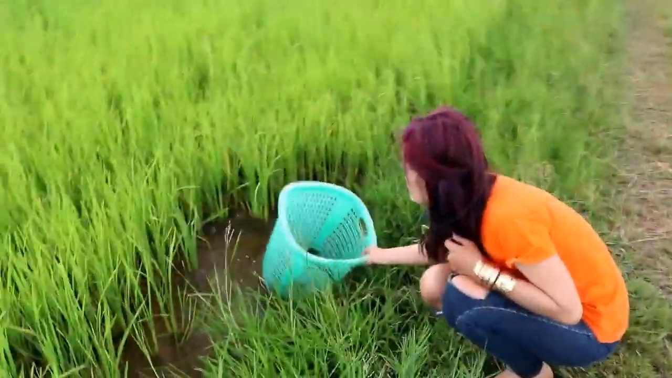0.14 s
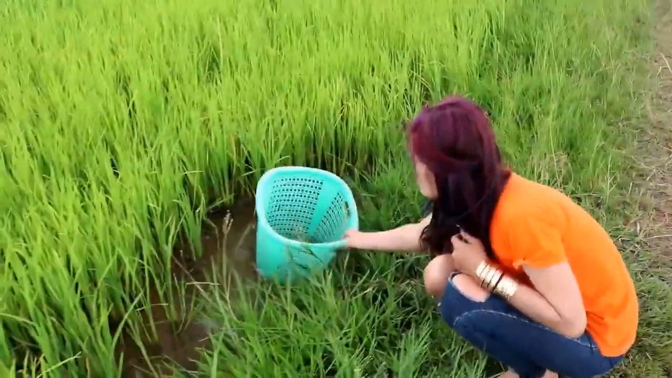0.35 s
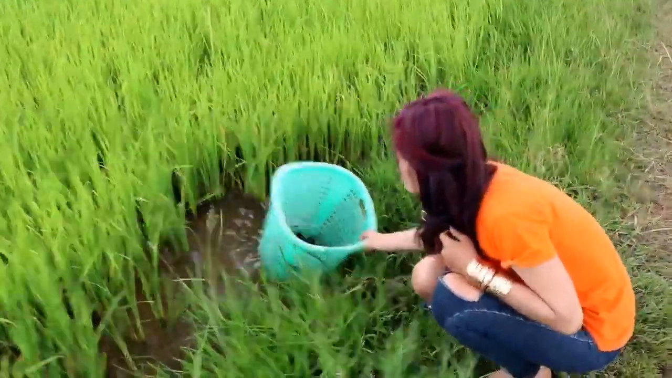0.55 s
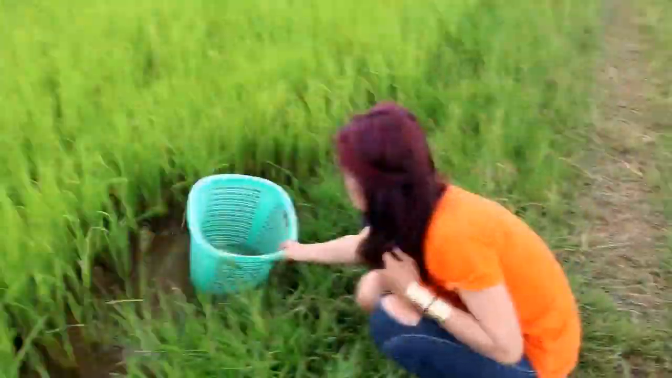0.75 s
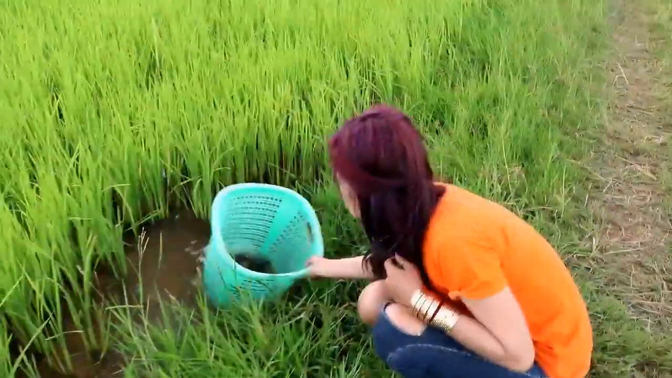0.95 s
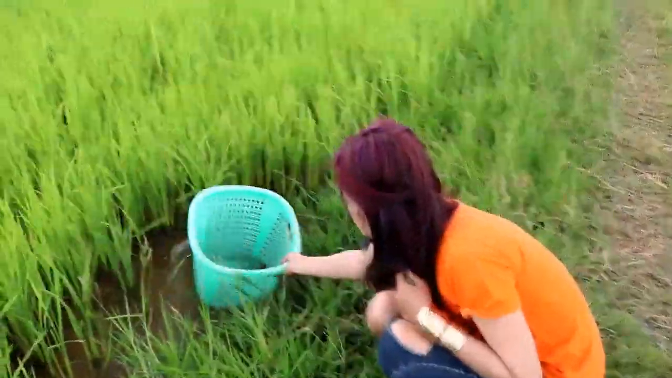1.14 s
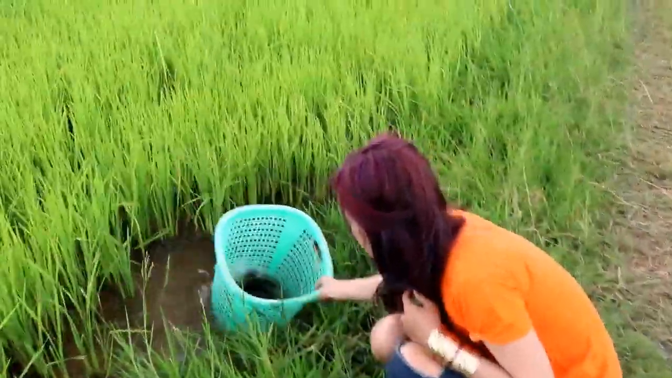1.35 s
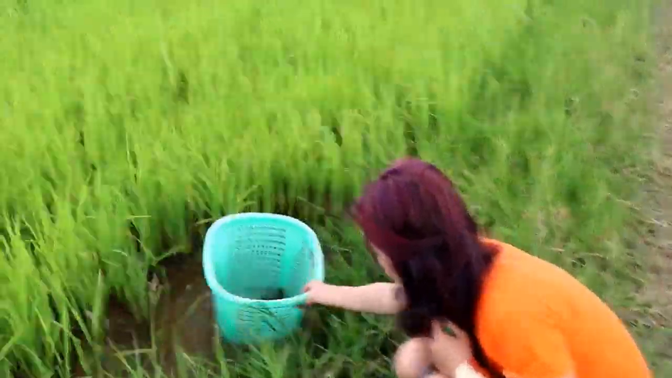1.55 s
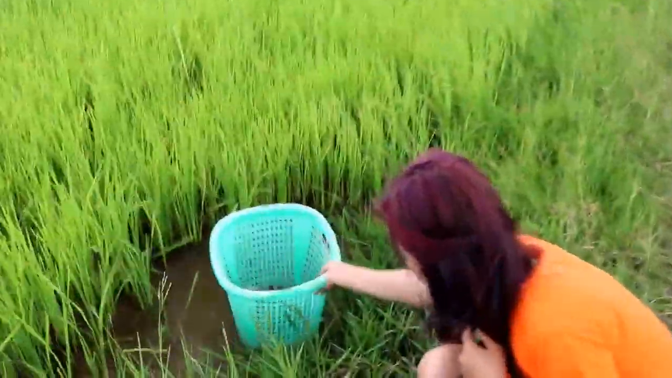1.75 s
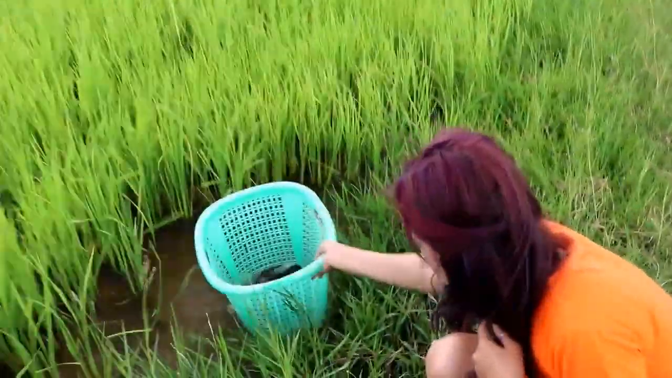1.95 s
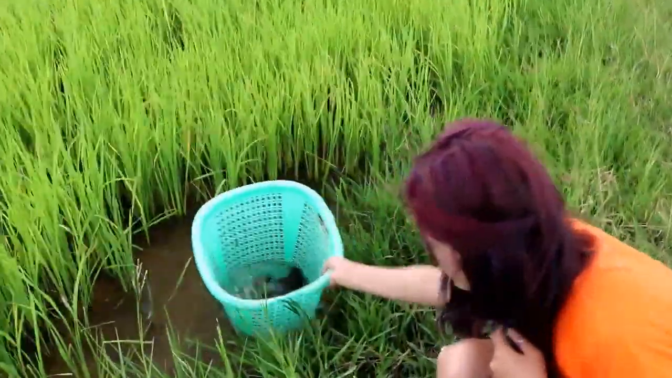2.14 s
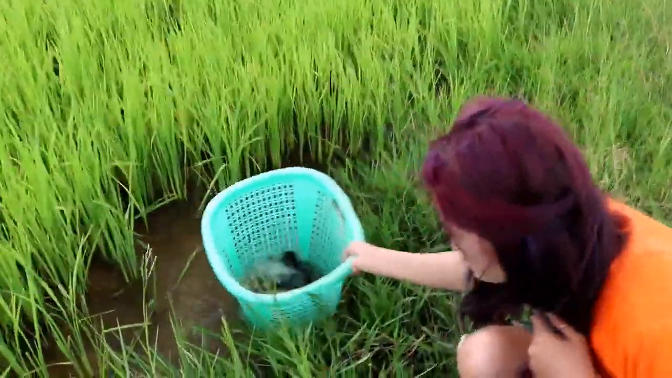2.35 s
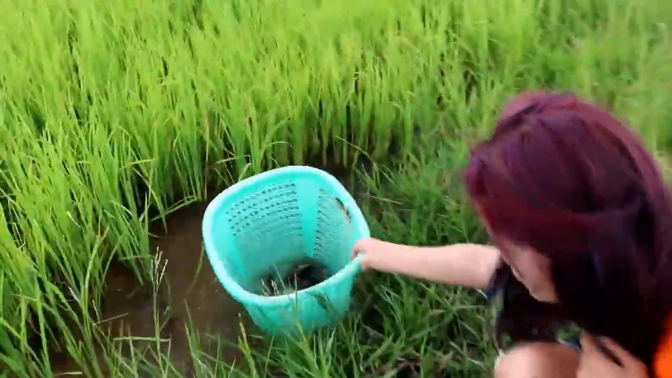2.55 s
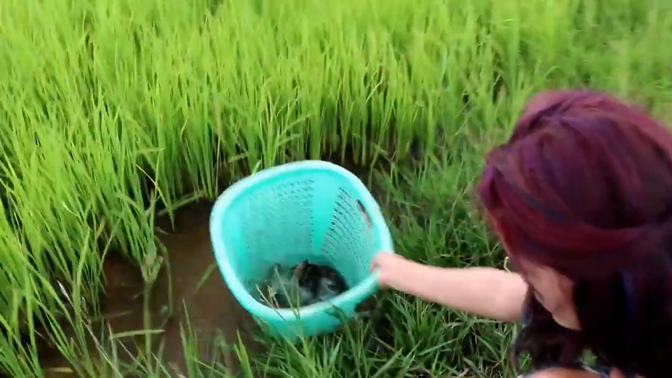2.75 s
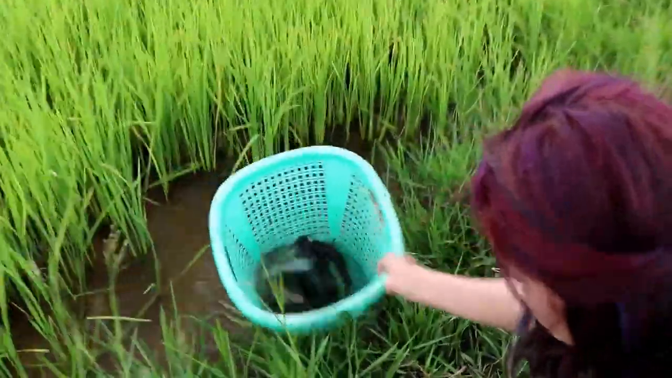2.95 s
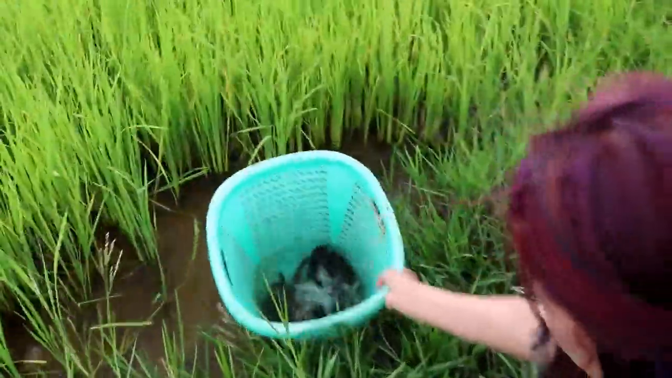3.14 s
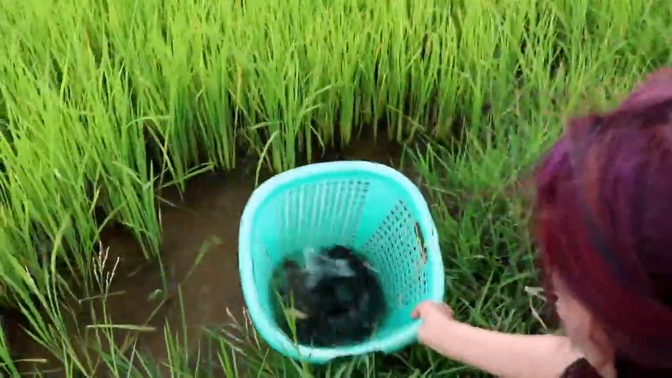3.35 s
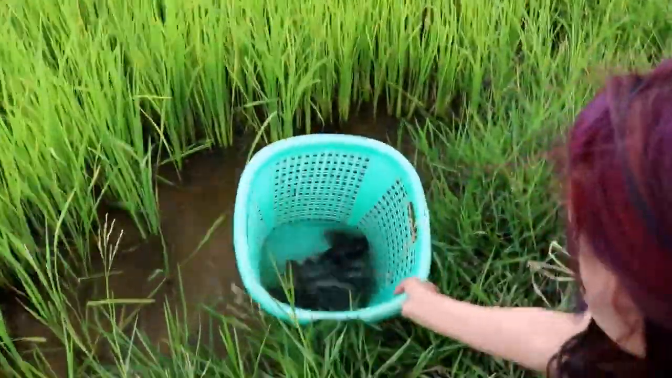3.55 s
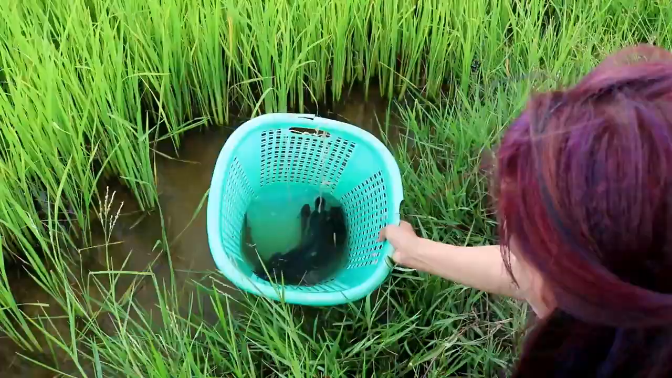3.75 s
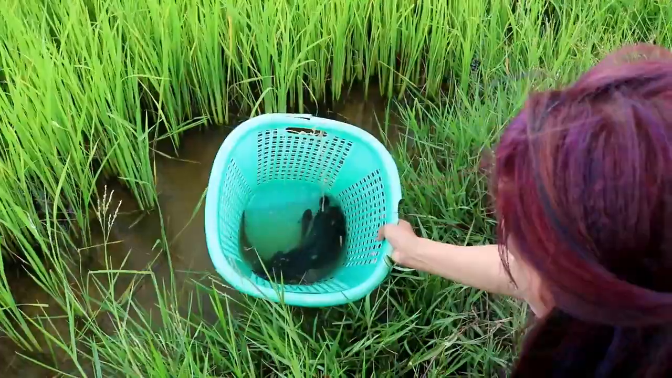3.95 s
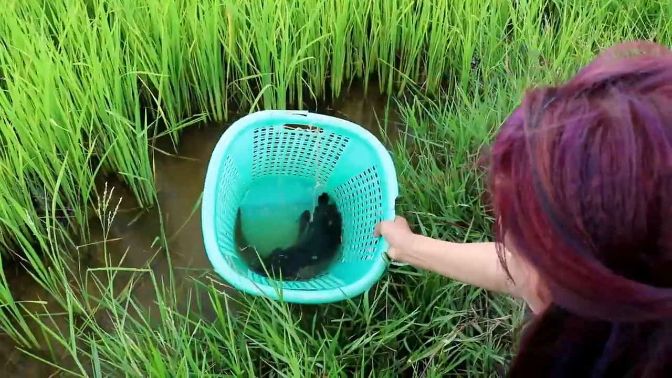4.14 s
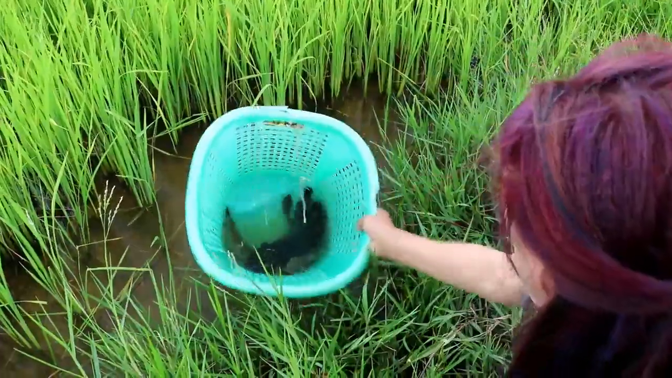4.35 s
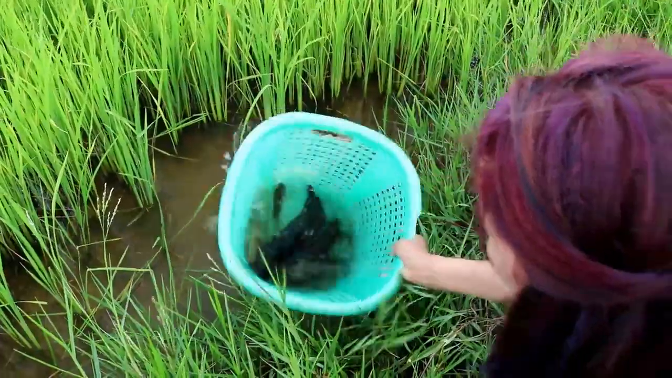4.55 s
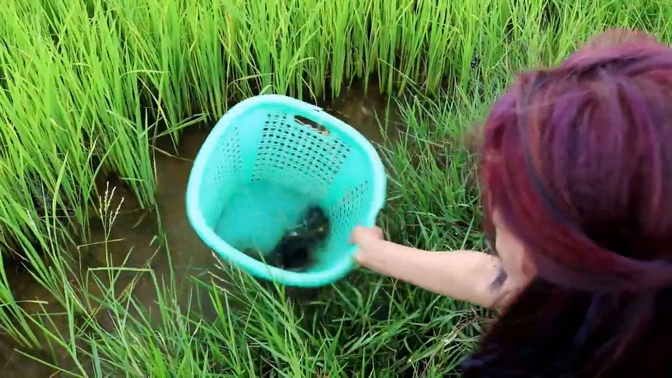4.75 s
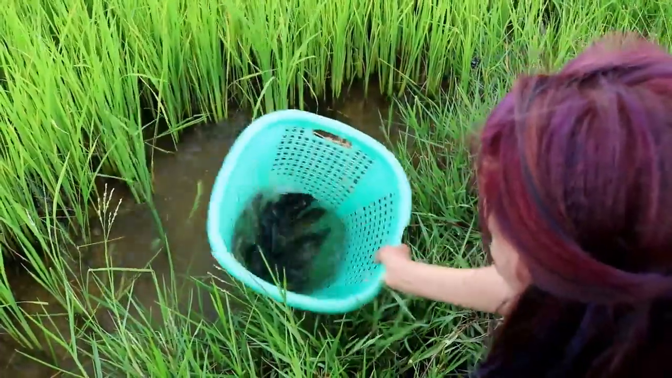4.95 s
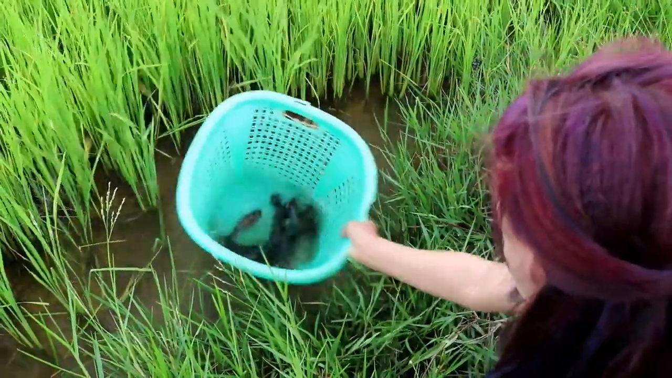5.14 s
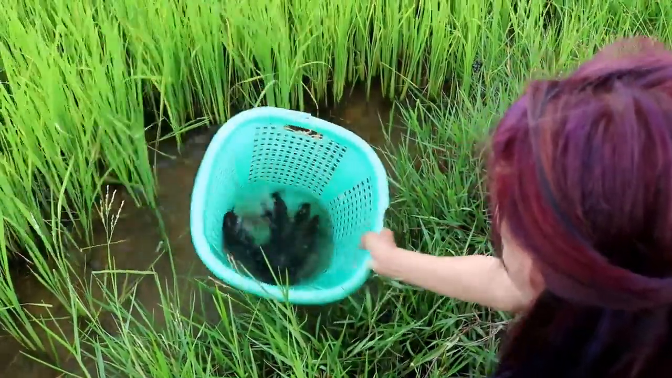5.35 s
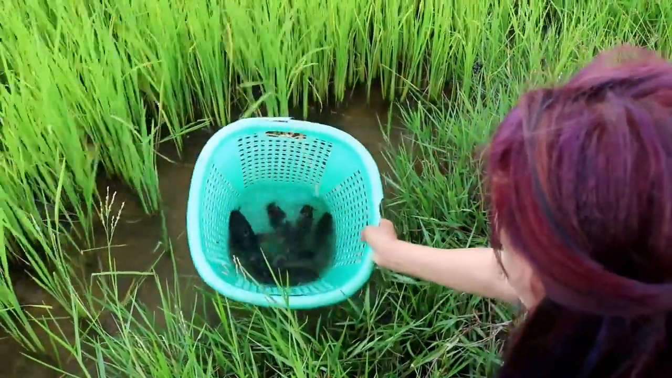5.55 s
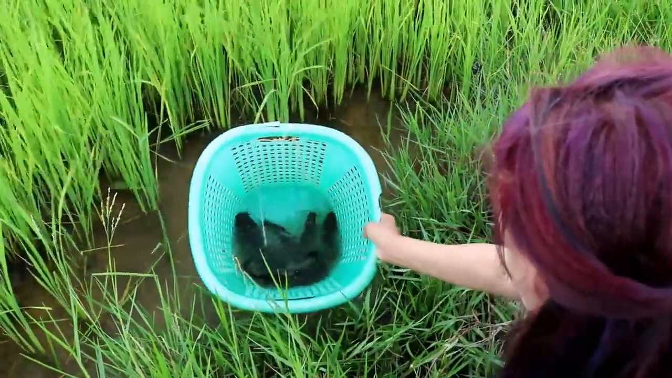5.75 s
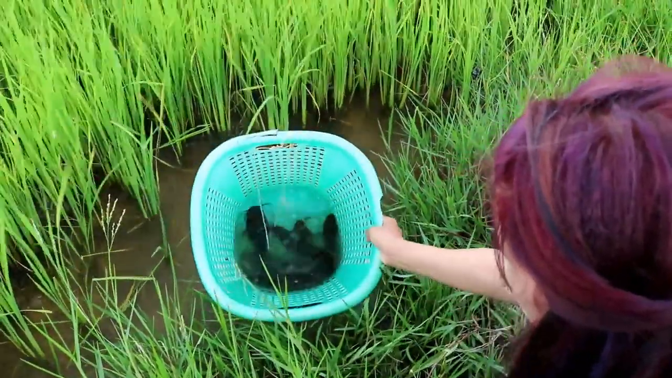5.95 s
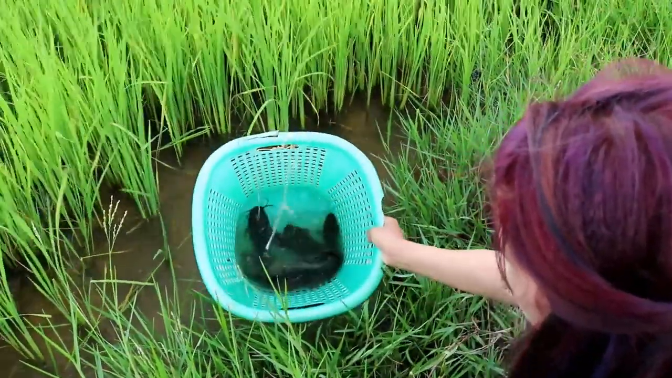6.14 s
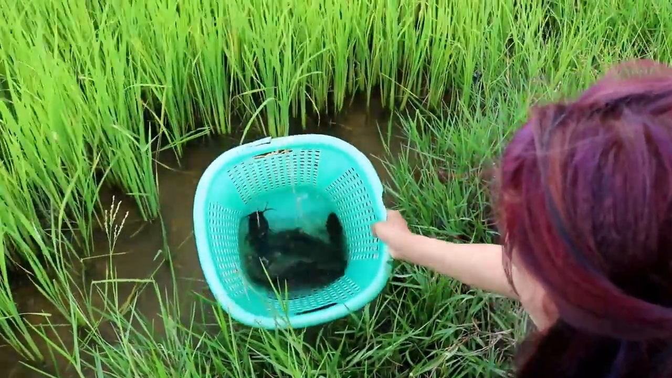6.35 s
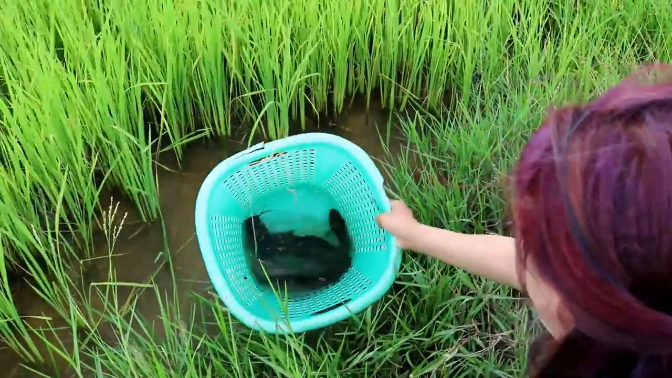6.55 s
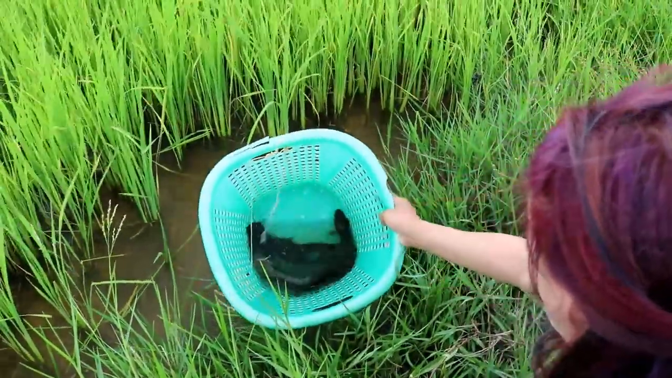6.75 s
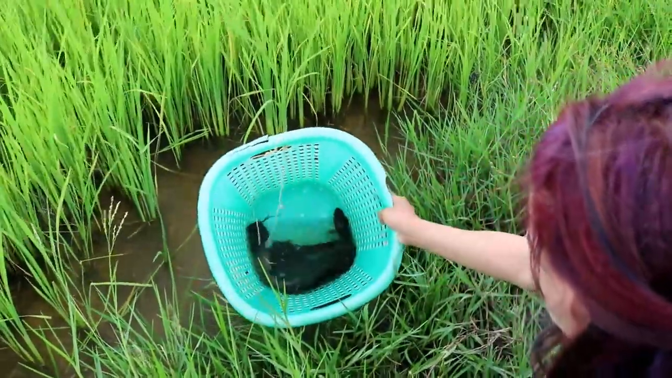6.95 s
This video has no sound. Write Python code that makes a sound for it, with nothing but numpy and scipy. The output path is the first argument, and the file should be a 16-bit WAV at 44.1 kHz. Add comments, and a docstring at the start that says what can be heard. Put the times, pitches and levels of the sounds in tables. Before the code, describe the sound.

Small lively splashes flutter in a plastic basket beside a rice field, close to the microphone. Tail slaps, bubbly plinks and bright droplet spray mix with hard little taps on plastic. Soft dull air bumps touch the microphone. After a near-silent gap the fish thrash once more, then settle, leaving quiet open air with a low engine drone.

```python
"""A rice paddy: live fish thrash in a plastic basket held in the shallow water.
Tail slaps are bursts of random droplet impacts; churning water is clouds of ringing, rising bubbles.
Spray is fine bubbles and droplets, sharp ticks ring the plastic, and changing echoes come off the surroundings.
Filtered noise gives a low rumble and a faint hiss, two sines a far-off engine, one sine a thin tone.
Puffs of air bump the microphone as low, quickly dying swings with a turbulent wake."""
import sys
import numpy as np
from scipy.fft import rfft, irfft
from scipy.io import wavfile

SR = 44100
rng = np.random.default_rng(int(sys.argv[2]) if len(sys.argv) > 2 else 0)


def transcribe(u):
    """Save the signal u as a 16-bit wav file named by the first command-line argument.

    u: samples, shape (n,) or (channels, n), limited to [-1, 1]; the rate is SR.
    q: integer samples, one column per channel.
    """
    v = np.clip(np.atleast_2d(u).T, -1, 1)
    q = np.round(v * 32767).astype(np.int16)
    wavfile.write(sys.argv[1], SR, q)


N = 308700   # 7 s
HZ = np.maximum(np.arange(N // 2 + 1) * SR / N, 1)   # frequency of each spectrum bin


def from_db(db):
    """Decibels to gain."""
    return 10 ** (np.asarray(db) / 20)


def rms_one(x):
    """Scale to unit power."""
    return x / np.sqrt(np.mean(x ** 2) + 1e-20)


def in_time(rows):
    """Each column of a time curve, interpolated at every sample."""
    times, *columns = np.transpose(rows)
    return [np.interp(np.arange(N) / SR, times, column) for column in columns]


def at_hz(points):
    """A spectral curve, interpolated over log frequency at every bin."""
    hz, value = np.transpose(points)
    return np.interp(np.log(HZ), np.log(hz), value)


def colour(x, spectrum):
    """Filter a sound with a smooth gain curve; rms 1."""
    return rms_one(irfft(rfft(x) * from_db(at_hz(spectrum)), N))


def drift(rate):
    """Random wandering, mostly slower than the rate in Hz; rms 1."""
    noise = rfft(rng.standard_normal(N))
    return rms_one(irfft(noise / (1 + (HZ / rate) ** 2), N))


def pan(balance_db):
    """Left and right gains; positive leans left."""
    return from_db(np.array([[1], [-1]]) * balance_db / 2)


def add(out, s, sound):
    """Mix a short sound in at a time in seconds."""
    i = int(np.clip(round(s * SR), 0, N - 1))
    out[:, i:i + sound.shape[-1]] += sound[..., :N - i]


def bubble(hz, t60, rise):
    """A pocket of air rings and dies away, its pitch gliding by the share rise within t60."""
    t = np.arange(int(max(t60, .002) * SR)) / SR
    swell = 1 - np.exp(-2 * hz * t)
    cycles = hz * (t + rise * t * t / (2 * t60))
    return swell * from_db(-60 * t / t60) * np.sin(2 * np.pi * cycles)


def bubble_cloud(low_hz, high_hz, cycles, rise, spread_db, pan_db, count):
    """Many bubbles at random times; small ones ring higher and die sooner; rms 1."""
    out = np.zeros((2, N))
    for when, size, damping, climb, strength, side, sign in rng.random((count, 7)):
        hz = low_hz * (high_hz / low_hz) ** size
        t60 = cycles * 2 ** (2 * damping - 1) / hz
        # strength in dB is exponentially spread, with a ceiling
        level_db = spread_db * min(-np.log(1 - strength), 2.4)
        gain = from_db(level_db) * hz * np.sign(sign - .5)
        ring = bubble(hz, t60, 2 * rise * climb)
        add(out, when * N / SR, gain * pan(pan_db * (2 * side - 1)) * ring)
    return rms_one(out)


def patter(per_s, spread_db, pan_db):
    """Random droplet impacts of unequal size, each differing in level and arrival between the ports; rms 1."""
    level_db = spread_db * np.minimum(rng.exponential(1, N), 3.6)
    sizes = from_db(level_db) * rng.choice([-1, 1], N)
    side = rng.triangular(-1, 0, 1, N)
    hits = rng.random(N) < per_s / SR
    left, right = sizes * hits * pan(pan_db * side)
    # the right port hears each impact up to 3 samples sooner or later
    arrival = (np.arange(N) + np.round(3 * side).astype(int)) % N
    return rms_one(np.array([left, np.bincount(arrival, right, N)]))


def air(spectrum):
    """Diffuse noise, alike on both sides in the bass and independent in the treble; rms 1."""
    # left-right likeness, below 0 taken as 0: (frequency [Hz], correlation [-])
    likeness = [(60, 0.8), (130, 0.94), (300, 0.56), (640, 0.5), (1400, -0.1), (3100, 0.1), (7000, -0.74),
                (15000, -4.5)]
    alike = np.clip(at_hz(likeness), 0, 1)
    mid, side = rfft(rng.standard_normal((2, N)))
    both = np.sqrt(1 + alike) * mid + np.sqrt(1 - alike) * side * [[1], [-1]]
    return colour(irfft(both, N), spectrum)


def low_rumble():
    """Diffuse low noise with a slow level curve and a slight flutter."""
    # (time [s], level [dB])
    rumble_level = [(0, -41), (1.9, -43.5), (2.8, -37.5), (3.9, -38), (4.5, -43), (5.6, -36.5), (6.1, -42),
                    (7, -42.5)]
    # (frequency [Hz], gain [dB])
    rumble_colour = [(20, -44), (48, -2), (80, -4), (116, -1), (165, -6), (330, -24), (500, -26.5),
                     (1000, -58)]
    return from_db(in_time(rumble_level)[0] + 1.07 * drift(45)) * air(rumble_colour)


def faint_hiss():
    """Diffuse broadband noise with a slow level curve."""
    # (time [s], level [dB])
    hiss_level = [(0, -46), (3.7, -47), (3.8, -52), (4.4, -51), (5.5, -45.5), (6.0, -49.5), (6.5, -48),
                  (7, -50)]
    # (frequency [Hz], gain [dB])
    hiss_colour = [(100, 4.5), (400, -1.5), (750, 1), (1300, -2.5), (2000, -1.5), (3000, -0.5), (4300, -1),
                   (6000, -5), (9300, -4.5), (11500, -9.5), (15500, -13)]
    return from_db(in_time(hiss_level)[0]) * air(hiss_colour)


def far_engine():
    """Only the two lowest orders of an engine carry across the fields, fading in and out with the air."""
    # (time [s], firing rate [Hz], level [dB]); both waver around these
    engine = [(0, 59, -67), (1.4, 53, -43.5), (2.2, 50, -45), (3.3, 65.4, -48), (4.05, 79.45, -38.5),
              (4.6, 51.36, -46), (5.4, 51, -49), (5.9, 60, -39.5), (6.5, 59.2, -47), (6.8, 48.7, -45)]
    hz, level_db = in_time(engine)
    phase = 2 * np.pi * np.cumsum(hz * (1 + 0.015 * drift(3.7))) / SR
    drone = from_db(-10.5) * np.sin(phase) + np.sin(2 * phase)
    return from_db(level_db + 6.5 * drift(8.6)) * drone


def faint_tone():
    """A thin, slightly wavering sine tone swells and fades twice."""
    # (start [s], length [s], level [dB])
    whistles = [(1.70, 0.28, -49), (2.02, 0.14, -52)]
    tone_hz, waver_hz = 994, 16.3
    level = np.zeros((1, N))
    for s, length, level_db in whistles:
        add(level, s, from_db(level_db) * np.hanning(int(length * SR)))
    return level * np.sin(2 * np.pi * np.cumsum(tone_hz + waver_hz * drift(21)) / SR)


def puffs():
    """An eddy pushes on one port more than the other: a dull bump of a few swings with a turbulent wake."""
    # (time [s], relative level [dB], starting pitch [Hz], left-right balance [dB])
    air_bumps = [(0.798, -20, 58, -5.5), (0.821, -31, 153, -6), (2.494, -23.5, 105, -23),
                 (2.528, -21, 240, -28), (2.755, -12.5, 178, -15), (2.81, -16.5, 242, -11),
                 (3.284, -19.5, 155, -9), (3.337, -25, 170, -11), (3.719, -19.5, 113, -12),
                 (3.778, -24.5, 70, -2), (3.814, -25, 167, 2), (3.859, -22.5, 177, 1),
                 (3.979, -18.5, 167, 5), (5.159, -29, 170, -20), (5.291, -26.5, 91, -18),
                 (5.433, -22, 184, -25.5), (5.522, -26.5, 423, -24), (5.533, -26, 120, -19),
                 (5.578, -24, 164, -21), (5.617, -16, 131, -10), (5.652, -19.5, 176, -18),
                 (5.929, -26, 131, -17)]
    out, wake = np.zeros((2, N)), np.zeros((2, N))
    for s, level_db, hz, balance_db in air_bumps:
        t60 = 5.2 / hz   # 5.2 cycles of the starting pitch
        push = from_db(level_db + 2.5) * pan(balance_db)
        add(out, s, push * bubble(hz, t60, rise=-0.18))   # the swings slow down
        add(wake, s - .008, push * np.hanning(int(t60 * SR)))
    wake_colour = [(30, 8.5), (120, 10), (270, 0.5), (400, -12), (800, -46.0)]   # (Hz, dB)
    turbulence = colour(rng.standard_normal((2, N)), wake_colour)
    return out + from_db(-15.5) * wake * turbulence


def ticks():
    """Drops and fins strike the damped modes of the plastic, each favouring those near its own centre."""
    # (time [s], level [dB], centre of the favoured modes [Hz])
    contacts = [(0.0756, -15, 5570), (0.6535, -20, 3500), (0.8868, -13, 8600), (0.914, -2.5, 7300),
                (1.1769, -16, 3400), (1.2947, -19, 5500), (1.3274, -18, 3600), (1.469, -14, 4800),
                (1.6138, -9, 4370), (1.7599, -20.5, 11600), (2.6193, -9, 4200), (3.083, -12, 8000),
                (2.9729, -14, 4100), (3.176, -9, 3900), (3.2557, -9, 5170), (3.731, -4.5, 6800),
                (4.63, -11.5, 7540), (4.7204, -10.5, 5200), (4.74, -14, 8450), (4.9382, -3.5, 7500),
                (4.9658, -10, 4200), (5.2549, -8, 6300), (5.3026, -14, 7400), (5.441, -14, 7400)]
    # modes of the plastic: (frequency [Hz], relative level [dB], t60 [s])
    plastic = [(1100, -24, 0.004), (2300, -16, .006), (3750, -7, 0.014), (5170, 2, 0.0065),
               (7490, 4, 0.0053), (9150, 6, 0.0032), (12800, 0, 0.0027)]
    out, t = np.zeros((2, N)), np.arange(700) / SR
    hz, mode_db, t60 = np.transpose(plastic)[:, :, None]
    chance = rng.standard_normal((len(contacts), 2, len(plastic), 1))
    for (s, level_db, centre_hz), luck in zip(contacts, chance):
        strength_db = mode_db - 8 * np.abs(np.log2(hz / centre_hz))
        detune = 1 + .07 * luck[0]
        # short waves reach the two ports out of step
        offset = np.array([1, -1])[:, None, None] * luck[1] * hz / 9000
        ringing = np.sin(2 * np.pi * hz * detune * t + offset)
        tick = np.sum(from_db(strength_db - 60 * t / t60) * ringing, axis=1)
        add(out, s, from_db(level_db) * tick / np.abs(tick).max())
    return out


def plinks():
    """The loudest bubbles, each from its own spot; the longer one rings, the further its pitch climbs."""
    # (time [s], level [dB], starting pitch [Hz], t60 [s])
    large_bubbles = [(0.088, -26, 624, 0.066), (0.267, -8, 4120, 0.014), (0.309, -24, 1410, 0.06),
                     (0.378, -0.5, 2000, 0.0028), (0.697, -6.5, 2300, 0.005), (0.775, -18, 1500, 0.024),
                     (0.816, -20, 2000, 0.038), (0.97, -20, 2200, 0.016), (1.141, -19.5, 2500, 0.019),
                     (1.175, -24, 3260, 0.025), (1.224, -15.5, 1920, 0.013), (1.294, -14, 5500, 0.0046),
                     (1.851, -26, 3140, 0.024), (1.921, -14.5, 2530, 0.0051), (2.157, -19.5, 1900, 0.01),
                     (2.496, -15, 2340, 0.012), (2.561, -16.5, 568, 0.029), (2.595, -9.5, 1000, 0.016),
                     (2.609, -13, 2500, 0.017), (2.638, -15, 1050, 0.051), (2.709, -9.5, 1800, 0.0079),
                     (2.856, -13, 580, 0.027), (2.972, -8, 4130, 0.0052), (3.149, -19, 2980, 0.01),
                     (3.171, -14.5, 1334, 0.053), (3.23, -12.5, 2190, 0.025), (3.281, -13, 3320, 0.0099),
                     (3.556, -12, 1380, 0.0069), (3.568, -31, 2200, 0.036), (4.334, -32.5, 2210, 0.021),
                     (4.574, -30.5, 798, 0.18), (4.603, -23.5, 790, 0.043), (4.783, -17, 1310, 0.036),
                     (4.799, -13.5, 2950, 0.024), (4.884, -7.5, 1560, 0.014), (4.937, -11, 1600, 0.0095),
                     (5.188, -14.5, 980, 0.014), (5.21, -9.5, 2430, 0.016), (5.249, -12, 1850, 0.015),
                     (5.755, -29, 1780, 0.0091)]
    rise_per_s = 11.5   # share by which the pitch climbs in a second
    out = np.zeros((2, N))
    sides = rng.standard_normal(len(large_bubbles))
    for (s, level_db, hz, t60), side in zip(large_bubbles, sides):
        add(out, s, from_db(level_db) * pan(.8 * side) * bubble(hz, t60, rise_per_s * t60))
    return out


def slaps():
    """A tail hits or flicks the surface and throws a dense, quickly dying burst of droplets."""
    # (time [s], level [dB], time to fall by 36 dB [s])
    tail_hits = [(0.374, -31.5, 0.031), (0.532, -20, 0.039), (0.647, -24, 0.029), (0.698, -30, 0.043),
                 (0.775, -25, 0.022), (0.907, -30, 0.025), (1.226, -37, 0.06), (1.463, -26.5, 0.034),
                 (1.718, -19.5, 0.018), (2.156, -29.5, 0.012), (2.859, -20.5, 0.022), (2.959, -18.5, 0.023),
                 (3.17, -23, 0.027), (3.229, -20, 0.015), (3.28, -20, 0.018), (3.558, -37, 0.0061),
                 (3.722, -31.5, 0.06), (4.691, -16, 0.0099), (4.72, -30, 0.01), (4.937, -26, 0.019),
                 (4.967, -22, 0.063), (5.215, -22, 0.031), (5.255, -23, 0.018), (5.439, -36, 0.011),
                 (5.756, -39, .01), (6.664, -42, .015)]
    force = np.zeros((1, N))
    for s, level_db, length in tail_hits:
        t = np.arange(int(2 * length * SR)) / SR
        attack = 1 - np.exp(-t / 0.00025)
        add(force, s, from_db(level_db - 36 * t / length) * attack)
    burst_colour = [(150, -16), (600, -2), (1500, 10), (3500, 17.5),
                    (6000, 8.5), (8500, 5.5), (15000, -7.5)]   # (Hz, dB)
    return force * colour(patter(12000, spread_db=5.0, pan_db=-6), burst_colour)


def stroke_envelope(settle_s, gurgle=False):
    """Strokes build quickly, hold while the fish pushes, then settle; overlapping ones add in power."""
    # a fish beats its body through the water:
    # (time [s], length [s], strength [dB], gurgle of a deep stroke relative to its strength [dB])
    strokes = [(0.07, 0.07, -32, -8.5), (0.167, 0.021, -36, -18), (0.229, 0.095, -32.5, -9),
               (0.365, 0.03, -30, -12), (0.516, .025, -31, -9), (0.629, 0.087, -33, 1),
               (0.757, 0.063, -31, -4.5), (0.872, 0.047, -38, 0.5), (1.052, 0.024, -40.5, -10),
               (1.11, 0.049, -38, -7), (1.216, 0.037, -31, -18), (1.303, 0.064, -31, -13),
               (1.428, 0.031, -37.5, -3), (1.511, 0.076, -35.5, -12), (1.6, 0.042, -36.5, -8.5),
               (1.653, 0.073, -35.5, -6.5), (1.902, 0.048, -41.5, -5.5), (2.031, 0.031, -37.5, -9),
               (2.158, 0.041, -42.5, 2), (2.214, .07, -34.5, -14), (2.289, 0.1, -28, -20),
               (2.374, 0.023, -30.5, -2), (2.47, 0.18, -36, -14), (2.549, 0.11, -33, -7.5),
               (2.674, 0.039, -28, -16), (2.763, .02, -49, 5), (2.802, 0.04, -37, 2.5),
               (2.835, 0.047, -32, -1.5), (2.935, 0.07, -30.5, -6), (3.03, 0.03, -43, 0),
               (3.145, 0.042, -30, -19.5), (3.236, 0.016, -29.5, -6), (3.28, 0.037, -27, -17),
               (3.332, 0.024, -33.5, -20), (3.473, 0.084, -42, -12), (3.544, .075, -41.5, -25),
               (3.76, 0.012, -47.5, 3), (4.496, 0.061, -42.5, -7), (4.56, 0.048, -43, -8),
               (4.726, 0.025, -53, -7), (4.78, .11, -28, -35), (4.931, 0.043, -26.5, -17),
               (5.17, 0.087, -29.5, -29), (5.287, 0.023, -41, -12), (5.436, 0.016, -41, -13)]
    attack_s = 0.0075
    power, t = np.zeros((1, N)), np.arange(SR // 2) / SR
    for s, length, level_db, gurgle_db in strokes:
        # settle_s is the time to fall to 1/e after the push
        shape = np.minimum(t / attack_s, 1) * np.exp(-np.maximum(t - length, 0) / settle_s)
        add(power, s, (from_db(level_db + gurgle * gurgle_db) * shape) ** 2)
    return np.sqrt(power[0])


def stirred_water():
    """Big bubbles gurgle, small ones chatter, the finest fizz and droplets patter, driven by strokes and unrest."""
    # how much the water keeps moving between strokes: (time [s], level [dB])
    unrest_level = [(0, -39), (0.9, -36), (1.0, -45.5), (1.1, -35), (1.7, -42.5), (1.8, -48), (2.1, -45),
                    (2.3, -42), (3.3, -36.5), (3.42, -48), (3.77, -43), (3.8, -69), (4.46, -60.5),
                    (4.55, -40), (4.92, -32), (5.04, -42.5), (5.35, -37.5), (5.55, -57), (7, -72.5)]
    # spray, louder once the microphone is over the basket: (time [s], level [dB])
    spray_reach = [(0, -1.5), (1.9, -0.5), (3.3, 1.5), (4.8, 2), (5.4, 0)]
    # colours of the three layers: (frequency [Hz], gain [dB])
    slosh_colour = [(150, 4.5), (330, -6.5), (600, 3.5), (1000, 5.5), (1400, -2.5), (2500, -41)]
    churn_colour = [(500, -72), (900, -7.5), (1250, -2), (1800, 0), (2800, -0.5), (4200, -4), (5500, -19),
                    (8000, -21)]
    spray_colour = [(1000, -20), (3000, 8.5), (5000, 1.5), (6300, -0.5), (8200, -0.5), (10000, -4),
                    (12000, -8.5), (15500, -13)]

    big = bubble_cloud(288, 1277, cycles=10, rise=0.26, spread_db=5.0, pan_db=3.5, count=2200)
    small = bubble_cloud(919, 6060, cycles=24.0, rise=0.45, spread_db=7.0, pan_db=2, count=4800)
    finest = bubble_cloud(4280, 11900, cycles=14, rise=0.05, spread_db=5.5, pan_db=19, count=5000)
    slosh = colour(big + from_db(2.5) * patter(3000, spread_db=2.0, pan_db=2), slosh_colour)
    churn = colour(small + from_db(2.0) * patter(7000, spread_db=1.5, pan_db=-2), churn_colour)
    spray = colour(from_db(-2.5) * finest + patter(9000, spread_db=4.5, pan_db=5), spray_colour)

    # unrest and strokes add in power
    unrest = from_db(in_time(unrest_level)[0])
    slosh = slosh * np.hypot(from_db(-10) * unrest, stroke_envelope(0.0097, gurgle=True))
    churn = churn * np.hypot(unrest, from_db(-1.5) * stroke_envelope(0.015))
    spray = spray * np.hypot(from_db(-4) * unrest, from_db(-4) * stroke_envelope(0.016))
    surge_db = 1.93 * drift(36)
    return from_db(surge_db) * (slosh + churn + from_db(in_time(spray_reach)[0]) * spray)


def scatter(x, t60, wet_db, count=4):
    """Basket walls and stalks return short sprays of echoes, which change as the splashes move about."""
    t, spectrum = np.arange(int(.06 * SR)) / SR, 0
    for place in range(count):
        echoes = rng.standard_normal((2, len(t))) * from_db(-60 * t / t60) * (t > .0006)
        echoes /= np.sqrt(count * np.sum(echoes ** 2, axis=1, keepdims=True))
        # each set of echoes receives a wandering share of the sound
        share = np.sqrt(2) * np.cos(np.pi * drift(7.5))
        spectrum = spectrum + rfft(x * share) * rfft(echoes, N)
    echo_colour_db = at_hz([(500, -10.5), (3000, 0.6), (10000, 2.6)])
    return x + irfft(spectrum * from_db(wet_db + echo_colour_db), N)


def scene():
    """Splashing in the basket, reaching the left port first, over the open-air background."""
    background = low_rumble() + faint_hiss() + far_engine() + faint_tone() + puffs()
    close = ticks() + plinks() + slaps() + stirred_water()
    left, right = scatter(close, t60=0.033, wet_db=-7.5)
    lag_s = .000012   # extra delay to the right port
    later_right = irfft(rfft(right) * np.exp(-2j * np.pi * HZ * lag_s), N)
    return background + np.array([left, later_right])


def record(dry):
    """The two microphone ports differ in colour; the top is cut steeply."""
    # (frequency [Hz], left-right balance [dB])
    port_balance = [(60, -2.5), (200, -2), (700, -1), (1300, 0.5), (2400, -4), (4400, -1.3), (8000, 0),
                    (15000, 2)]
    cutoff_hz = 15900
    top = 1 / np.sqrt(1 + (HZ / cutoff_hz) ** 200)
    return np.clip(irfft(rfft(dry) * pan(at_hz(port_balance)) * top, N), -1, 1)


dry = scene()
out = record(dry)
transcribe(out)
```